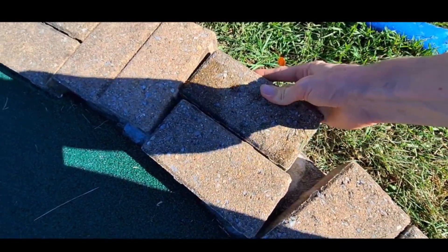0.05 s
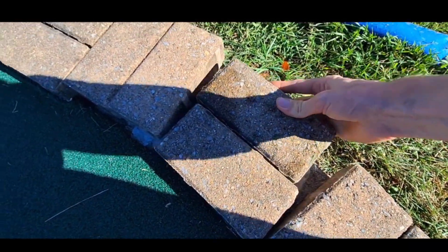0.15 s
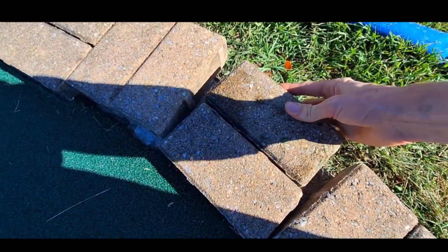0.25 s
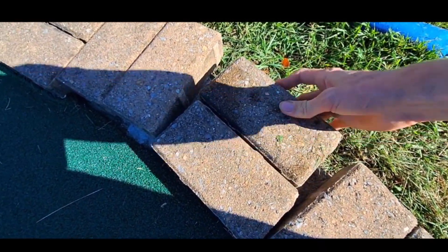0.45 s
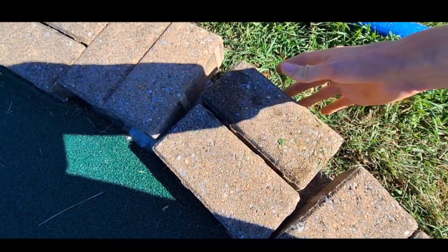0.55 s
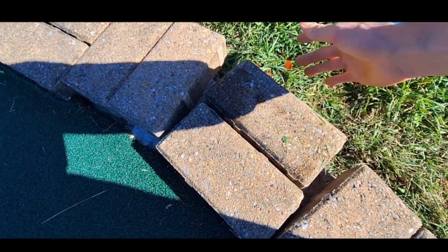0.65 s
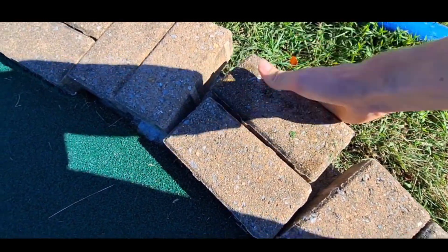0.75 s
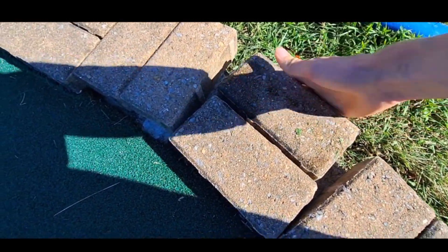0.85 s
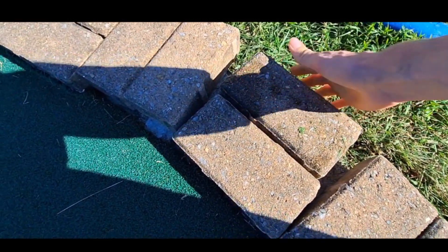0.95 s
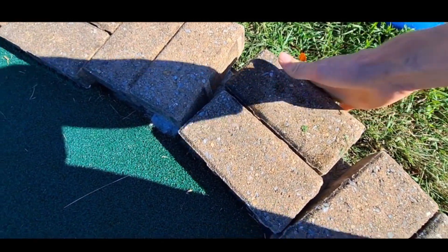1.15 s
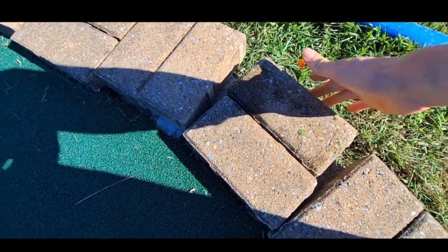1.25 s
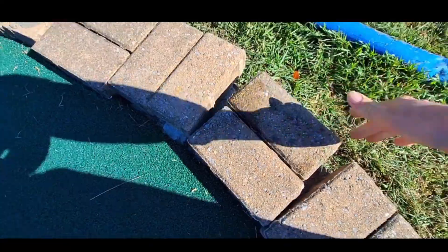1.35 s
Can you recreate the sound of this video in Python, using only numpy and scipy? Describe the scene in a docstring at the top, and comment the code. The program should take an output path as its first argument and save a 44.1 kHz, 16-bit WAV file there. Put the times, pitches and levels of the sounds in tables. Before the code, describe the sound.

Gritty scraping and clacks of a loose paving brick shifted outdoors, over faint wind rumble.

```python
"""A loose paving brick, worked by hand against its neighbours, outdoors and close by.
It grinds, judders and knocks into place, slides again lightly, then drops back on its bed.
Tiny slips make the grind; grit and knocks set two bricks ringing faintly.
Sand crunches and the ground thumps; a breeze rumbles on the microphone over a soft hiss."""
import sys
import numpy as np
from scipy import signal
from scipy.fft import rfft, irfft
from scipy.io import wavfile
from scipy.ndimage import uniform_filter1d, minimum_filter1d

SR = 44100
rng = np.random.default_rng(int(sys.argv[2]) if len(sys.argv) > 2 else 0)


def generate_wav(sig):
    """Save sig (samples, or channels by samples) to the path in sys.argv[1] as 16-bit PCM at SR."""
    pcm = np.round(np.clip(np.atleast_2d(sig).T, -1, 1) * 32767).astype(np.int16)
    wavfile.write(sys.argv[1], SR, pcm)


N = 61739
TIME = np.arange(N) / SR

# modes of each brick: freq_hz, level_db, t60_s
LOOSE_MODES = [(5982, -0.5, .065), (6150, -16, 0.041), (7500, -9, .05), (11810, -4, 0.049),
               (12200, -12, .05), (12800, -17.5, 0.052)]
NEIGHBOUR_MODES = [(5603, -4.5, .08), (11350, -12, 0.041), (11690, -12, 0.058)]
# spectrum of a knock: freq_hz, level_db
KNOCK_SPECTRUM = [(80, -25.5), (330, -13), (500, -2), (800, 4), (1100, -2), (1550, -3), (2000, -11),
                  (3200, -23), (4300, -45), (7000, -56.5), (16000, -60.5)]


def amp(db):
    """Decibels to gain."""
    return 10 ** (np.asarray(db) / 20)


def unit_rms(x):
    """Scales to rms 1."""
    return x / np.sqrt(np.mean(x ** 2) + 1e-20)


def steadied(x, window_samples):
    """Holds the short-time rms near 1."""
    power = uniform_filter1d(uniform_filter1d(x ** 2, window_samples), window_samples)
    return x / np.sqrt(abs(power) + 1e-12)


def add(mix, start_s, sound):
    """Mixes a sound in at start_s."""
    part = mix[max(round(start_s * SR), 0):][:len(sound)]
    part += sound[:len(part)]


def curve(rows, column=1):
    """One table column interpolated over TIME."""
    columns = np.transpose(rows)
    return np.interp(TIME, columns[0], columns[column])


def spectrum_gain(spectrum, freq_hz):
    """Gain at freq_hz, interpolated in dB over log frequency."""
    hz, db = np.transpose(spectrum)
    return amp(np.interp(np.log(freq_hz + 1), np.log(hz), db))


def response(spectrum, size=4096):
    """Minimum-phase impulse response, energy 1."""
    log_gain = np.log(spectrum_gain(spectrum, abs(np.fft.fftfreq(size, 1 / SR))))
    impulse = np.fft.ifft(np.exp(signal.hilbert(log_gain).conj())).real[:size // 2]
    return impulse / np.linalg.norm(impulse)


def through(x, impulse):
    """Convolution, cut to the length of x."""
    return signal.fftconvolve(x, impulse)[:len(x)]


def noise(spectrum):
    """Steady shaped noise, rms 1."""
    gain = spectrum_gain(spectrum, np.fft.rfftfreq(N, 1 / SR))
    return unit_rms(irfft(rfft(rng.standard_normal(N)) * gain, N))


def outdoors():
    """Lumpy breeze rumble on the microphone over a soft, wide hiss."""
    # freq_hz, level_db
    wind_spectrum = [(15, -33.5), (30, -16.5), (45, -3), (70, -0.5), (100, -3), (150, -13), (250, -21.5),
                     (400, -25.5), (700, -48.5), (1500, -69)]
    hiss_spectrum = [(40, -10), (300, -1.5), (480, -4.5), (700, -14.5), (1500, -19), (4000, -23),
                     (9000, -24.5), (15000, -23.5), (16000, -23.5)]
    # time_s, level_db
    wind_levels = [(0, -30), (.03, -34.5), (.06, -48.5), (.14, -33.5), (.25, -40), (.4, -37), (.52, -40),
                   (.57, -54), (.62, -36), (.68, -49), (.73, -44), (.86, -49.5), (.96, -44.5),
                   (1.06, -33.5), (1.15, -37), (1.2, -51), (1.25, -48), (1.4, -57.5)]
    hiss_levels = [(0, -50), (.08, -56), (.4, -54), (.65, -55.5), (.88, -58), (.99, -52), (1.09, -52.5),
                   (1.25, -56), (1.4, -56.5)]
    fade_in = np.minimum(TIME / .005, 1)
    wind = steadied(noise(wind_spectrum), 2000) * amp(curve(wind_levels)) * fade_in
    return wind + noise(hiss_spectrum) * amp(curve(hiss_levels))


def bed():
    """Sand crunches and the ground thumps under the brick."""
    # crushed sand: start_s, level_db, decay_s
    crunches = [(0.2326, -37, .003), (.682, -49, 0.00099), (1.1303, -39, .002), (1.1320, -32.5, 0.0021),
                (1.1375, -45, 0.0031), (1.153, -48, .005)]
    # freq_hz, level_db
    crunch_spectrum = [(300, -10), (1500, 3), (4000, -8.5), (9000, -0.5), (13000, -2), (16000, -5)]
    # dull thumps: start_s, level_db, pitch_hz, t60_s
    bumps = [(0.498, -21.5, 99, 0.077), (.598, -28.5, 72, .16), (0.9567, -39, 426.5, 0.042),
             (0.956, -29.5, 169.3, 0.069), (1.056, -30.5, 211, 0.1), (1.064, -25.5, 78, 0.19),
             (1.1346, -20.5, 88.2, 0.079), (1.1305, -25, 541, 0.036), (1.151, -28.5, 506, 0.041)]
    out, t, sand = np.zeros(N), TIME[:SR // 4], response(crunch_spectrum)
    for start_s, level_db, decay_s in crunches:
        burst = rng.standard_normal(len(t)) * np.exp(-t / decay_s)
        add(out, start_s, amp(level_db) * through(burst, sand))
    attack = 1 - np.exp(-t / 0.0014)
    for start_s, level_db, pitch_hz, t60_s in bumps:
        envelope = amp(level_db - 60 * t / t60_s) * attack
        add(out, start_s, envelope * np.sin(2 * np.pi * pitch_hz * t))
    return out


def ring(modes, tilt_db_per_oct=0):
    """Modes of a struck brick; each blow weights them differently, brighter or duller by its tilt."""
    t, rise_s = TIME[:SR // 5], .0003
    tones = np.zeros(len(t))
    for freq_hz, level_db, t60_s in modes:
        struck_db = level_db + tilt_db_per_oct * np.log2(freq_hz / modes[0][0]) + rng.normal()
        tones += amp(struck_db - 60 * t / t60_s) * np.sin(2 * np.pi * (freq_hz * t + rng.random()))
    return (1 - np.exp(-t / rise_s)) * tones


def judder():
    """The brick catches and breaks free: a few stick-slip cycles, heard as a pitched knock."""
    # start_s, level_db, pitch_hz, length_s
    bursts = [(.2333, -2, 1353, 0.0043), (0.2589, -13.5, 1587, .0028), (0.534, -43, 1370, 0.0046),
              (1.152, -35, 880, 0.0049)]
    rise_s, fall_exponent = .0004, 4.3
    overtone_db, overtone_ratio, overtone_s = -16.5, 2.25, .0011
    ring_db, kick_db = -34, -17.5  # relative to level_db
    out, t, body = np.zeros(N), TIME[:1024], response(KNOCK_SPECTRUM)
    attack = np.minimum(t / rise_s, 1)
    overtone_envelope = t / overtone_s * np.exp(1 - (t / overtone_s) ** 2)
    for start_s, level_db, pitch_hz, length_s in bursts:
        phase = 2 * np.pi * pitch_hz * t
        burst = np.exp(-(t / length_s) ** fall_exponent) * np.sin(phase)
        overtone = amp(overtone_db) * overtone_envelope * np.sin(overtone_ratio * phase)
        ringing = (ring(LOOSE_MODES) + ring(NEIGHBOUR_MODES, tilt_db_per_oct=8.5)) / 2
        add(out, start_s, -amp(level_db) * attack * (burst + overtone))
        add(out, start_s, amp(level_db + ring_db) * ringing)
        add(out, start_s, -amp(level_db + kick_db) * body / abs(body).max())
    return out


def knocks():
    """Brick on brick: a dead clack, duller for a longer contact, and a thin ring."""
    # start_s, peak_db, contact_ms, loose_ring_db, neighbour_ring_db, tilt_db_per_oct
    contacts = [(.1508, -25, 0.64, -57, -54.5, 11), (.162, -25, 0.27, -51, -61, 8),
                (.172, -28, .3, -56, -60, -11), (.189, -28, 0.081, -42.5, -37.5, 3),
                (.207, -24, .25, -42.5, -54, 5.5), (.214, -18, 0.05, -42.5, -38, -6),
                (.219, -21, 0.083, -52.5, -53, 4), (.2216, -21.5, 0.05, -49.5, -51, -7),
                (.2274, -14.5, 0.047, -51, -36.5, 11), (.2493, -31, 0.32, -28.5, -46, -4.5),
                (.2565, -11, 0.07, -51.5, -54.5, -4), (.2576, -7.5, 0.069, -44, -54.5, -5),
                (.2637, -16, 0.11, -57, -61, 15.5), (.267, -15.5, 0.12, -54.5, -60.5, -2),
                (.297, -32.5, 0.037, -56, -65, -15), (.449, -39, 0.16, -46.5, -48, 8.5),
                (.475, -36, 0.37, -48, -48, 0), (.497, -32.5, 0.11, -48, -61, 9),
                (.507, -41, .2, -40.5, -33.5, -6), (.515, -40, .06, -42.5, -58, -22),
                (.531, -32.5, 0.043, -61, -40, -3), (.6, -44, 0.26, -66, -74, -2),
                (.877, -58, 0.18, -60, -70, -10), (1.132, -31.5, 0.072, -60.5, -60, 3),
                (1.1376, -24.5, 0.66, -39, -62, 0.5), (1.151, -26.5, 0.87, -55, -66, 0)]
    tail_db, tail_t60_s = -12.5, .04
    out, t, body = np.zeros(N), TIME[:2048], response(KNOCK_SPECTRUM)
    for start_s, peak_db, contact_ms, loose_ring_db, neighbour_ring_db, tilt_db_per_oct in contacts:
        force = np.exp(-t / (contact_ms / 1000))
        clack = through(body, force)
        scatter = rng.standard_normal(len(t)) * amp(-60 * t / tail_t60_s)
        clack = clack + amp(tail_db) * through(clack, scatter / np.linalg.norm(scatter))
        add(out, start_s, amp(peak_db) * clack / abs(clack).max())
        add(out, start_s, amp(loose_ring_db) * ring(LOOSE_MODES, tilt_db_per_oct))
        add(out, start_s, amp(neighbour_ring_db) * ring(NEIGHBOUR_MODES, tilt_db_per_oct))
    return out


def grains(rate_per_s, spread_db):
    """Random tiny impacts of uneven size."""
    strength = amp(spread_db * np.clip(rng.standard_normal(N), -2, 2)) * rng.choice([-1, 1], N)
    return strength * (rng.random(N) < rate_per_s / SR)


def catches(rate_hz=127, depth_db=3):
    """Uneven swings of friction as the brick catches and lets go, as a gain."""
    hz = np.fft.rfftfreq(N, 1 / SR)
    band = hz ** 2 * np.exp(-(hz / rate_hz) ** 2)
    swing = unit_rms(irfft(rfft(rng.standard_normal(N)) * band, N))
    return unit_rms(amp(depth_db * np.clip(swing, -2, 2)))


def grit(friction, sand_db, loose_tilt_db_per_oct, neighbour_tilt_db_per_oct):
    """Grit sets both bricks ringing while sand hisses."""
    # neighbour's part of the ring: time_s, power_share
    neighbour_share = [(.05, 0.34), (.19, 0.25), (.25, 0), (.45, .2), (.5, 0.7), (.538, 1), (.572, 0.5)]
    # freq_hz, level_db
    sand_spectrum = [(1000, -10), (4000, 0.5), (7000, 2.5), (9500, -7.5), (13000, -3.5), (16000, -5)]
    rings = ring(LOOSE_MODES, loose_tilt_db_per_oct), ring(NEIGHBOUR_MODES, neighbour_tilt_db_per_oct)
    loose, neighbour = (steadied(through(friction * grains(rate_per_s=500, spread_db=7), tone), 700)
                        for tone in rings)
    share = np.clip(curve(neighbour_share), 0, 1)
    sand = amp(sand_db) * friction * noise(sand_spectrum)
    return np.sqrt(1 - share) * loose + np.sqrt(share) * neighbour + sand


def grind(friction, spectrum):
    """Tiny slips shake the paving; the treble opens as the hand pushes harder."""
    # hand pressure: time_s, treble_db
    pressure = [(.1, -10), (.155, -36), (.19, 1.5), (.225, 3.5), (.27, 0), (.45, 1)]
    crossover_hz = 1500
    slips = grains(rate_per_s=1400, spread_db=3.5)
    shaking = friction * steadied(through(slips, response(spectrum)), 500)
    low = signal.sosfiltfilt(signal.butter(2, crossover_hz, fs=SR, output="sos"), shaking)
    return low + (shaking - low) * amp(curve(pressure))


def scrape(stroke, spectrum, sand_db, tilts_db_per_oct):
    """One stroke: the same friction drives grind and grit. Tilts: loose brick, neighbour."""
    friction = catches()
    grinding = grind(friction, spectrum) * amp(curve(stroke))
    gritty = grit(friction, sand_db, *tilts_db_per_oct) * amp(curve(stroke, column=2))
    moving = (TIME >= stroke[0][0]) & (TIME <= stroke[-1][0])
    return (grinding + gritty) * moving


def scrapes():
    """The loose brick is shoved hard, slides lightly, then settles after its drop."""
    # strokes: time_s, grind_db, grit_db
    shove = [(0, -56, -77), (.028, -54, -55.5), (.06, -80, -99), (.095, -52, -64), (.142, -43.5, -58.5),
             (.153, -34.5, -51.5), (.176, -35, -49), (.198, -35.5, -49), (.215, -29.5, -40),
             (.232, -30, -37.5), (.243, -33, -43.5), (.254, -30.5, -45), (.266, -29, -49),
             (.28, -44.5, -61), (.31, -56, -78), (.35, -67.5, -82)]
    slide = [(.37, -77, -69.5), (.42, -60.5, -65), (.452, -50, -55), (.474, -46.5, -54), (.486, -56, -63),
             (.505, -36.5, -48.5), (.518, -44.5, -48), (.532, -35.5, -50), (.549, -53, -55.5),
             (.566, -46.5, -46.5), (.586, -63.5, -69.5), (.63, -67, -79.5)]
    settle = [(1.129, -43, -70.5), (1.135, -43.5, -57.5), (1.145, -42.5, -63), (1.154, -40.5, -49.5),
              (1.162, -58, -59), (1.172, -52.5, -61), (1.19, -74, -66)]
    # grind spectra: freq_hz, level_db
    hard_spectrum = [(100, -22.5), (300, -14), (550, -1), (900, -4), (1400, -4), (1900, -17.5), (3000, -22),
                     (4200, -42.5), (7000, -51.5), (16000, -60.5)]
    light_spectrum = [(100, -23.5), (250, -12), (420, 7), (750, -2.5), (1020, -21.5), (1330, 4.5),
                      (1600, -4), (1950, -15), (2600, -11), (3400, -26), (7000, -38.5), (16000, -45)]
    return (scrape(shove, hard_spectrum, sand_db=-6, tilts_db_per_oct=(-3, 5))
            + scrape(slide, light_spectrum, sand_db=-9, tilts_db_per_oct=(2, -5))
            + scrape(settle, hard_spectrum, sand_db=1.5, tilts_db_per_oct=(4, -1.5)))


def scene():
    """All sources at one close microphone."""
    return (scrapes() + knocks() + judder() + bed() + outdoors())[None]


def record(dry):
    """Fast peak limiter, then a steep low-pass."""
    ceiling, cutoff_hz = .93, 15950
    held_peak = -minimum_filter1d(-abs(dry), 200)
    limited = dry / np.maximum(uniform_filter1d(held_peak, 100) / ceiling, 1)
    lowpass = signal.firwin(511, cutoff_hz, window=("kaiser", 9), fs=SR)
    return signal.oaconvolve(limited, lowpass[None], "same")


dry = scene()
out = record(dry)
generate_wav(out)
```